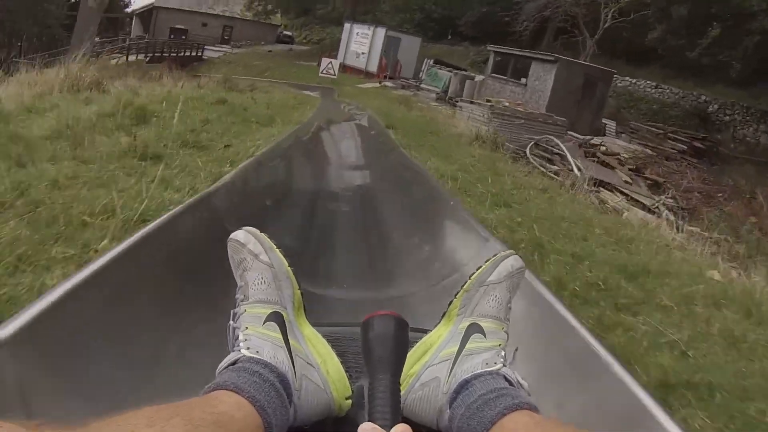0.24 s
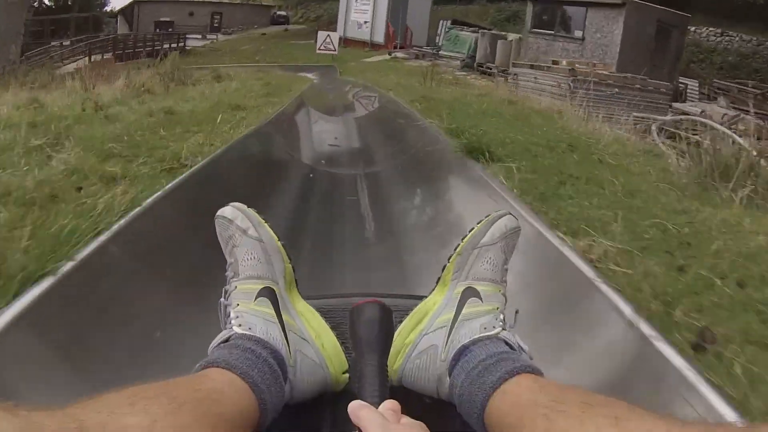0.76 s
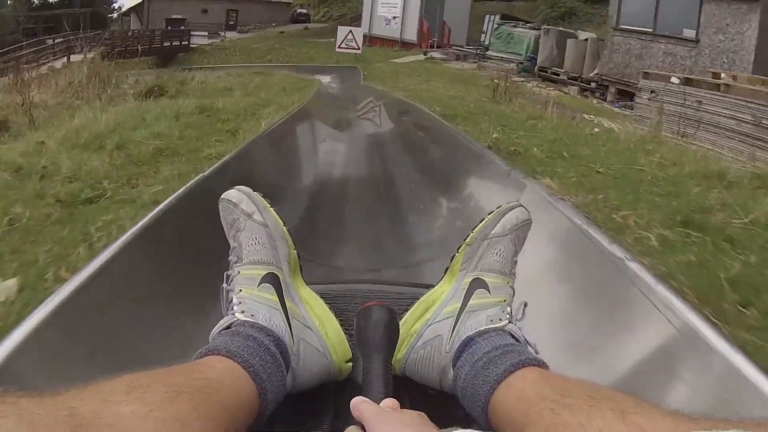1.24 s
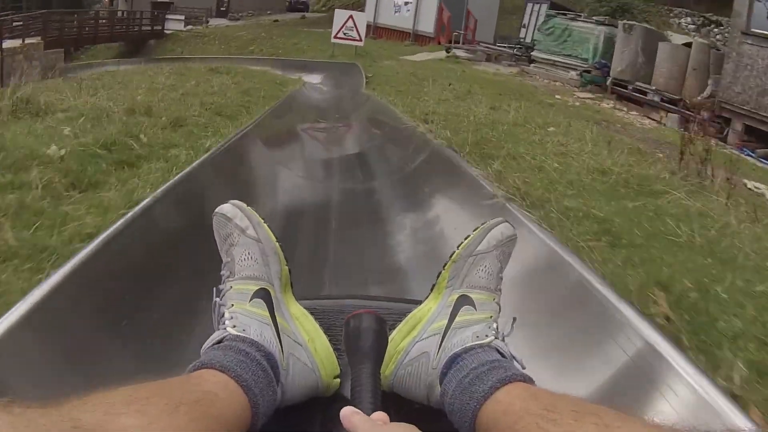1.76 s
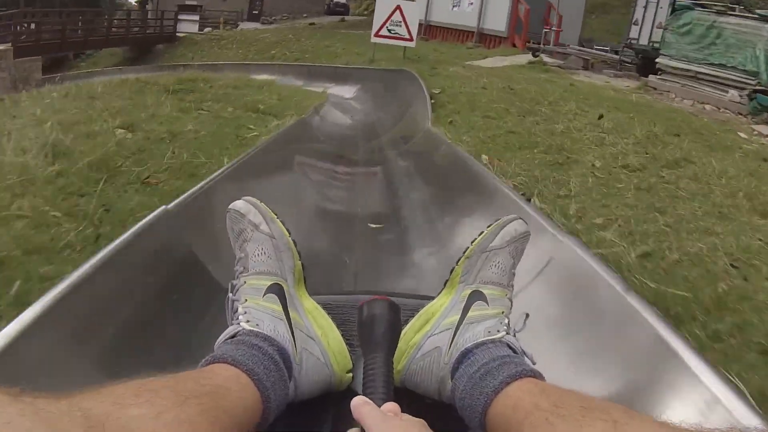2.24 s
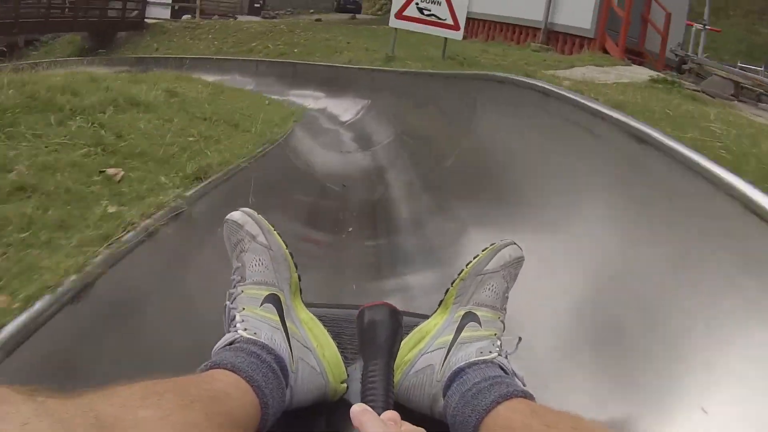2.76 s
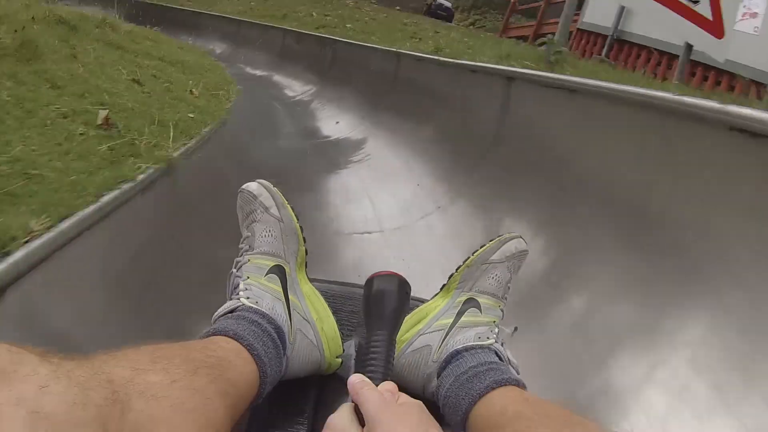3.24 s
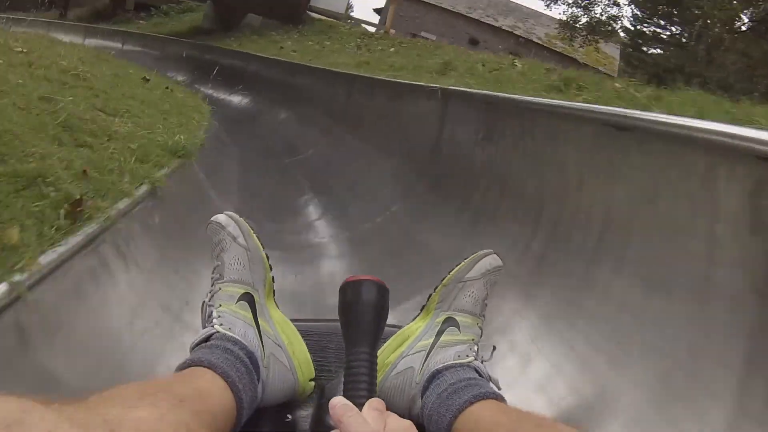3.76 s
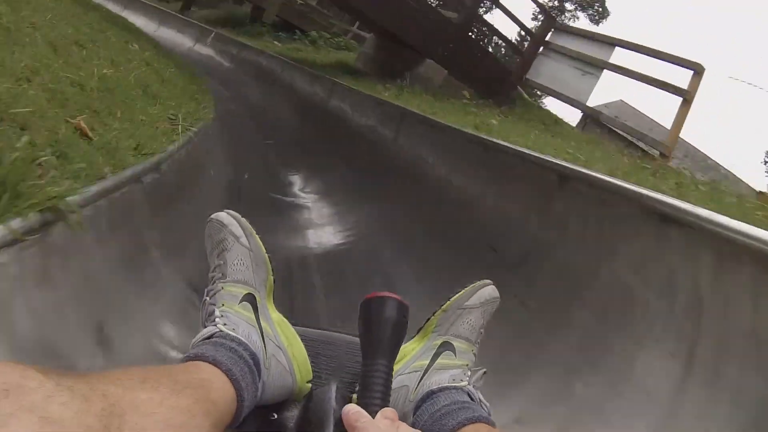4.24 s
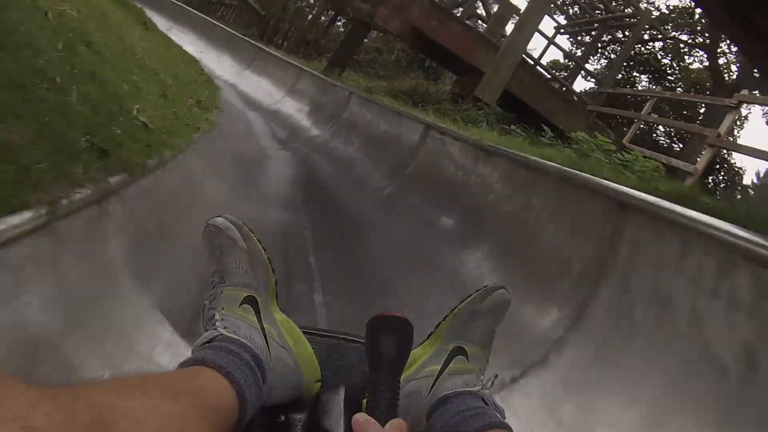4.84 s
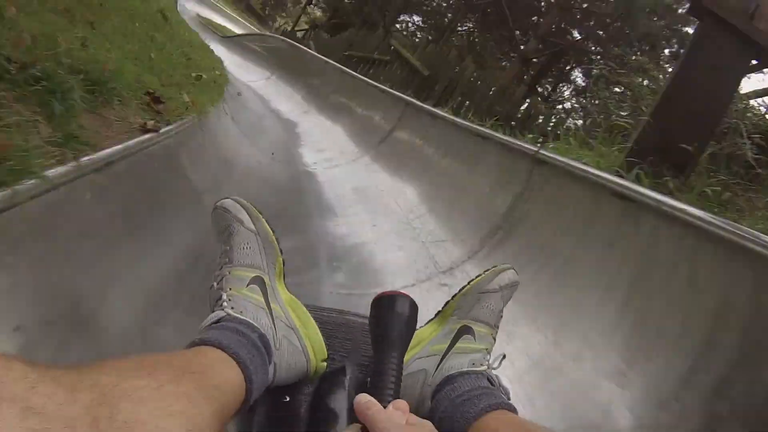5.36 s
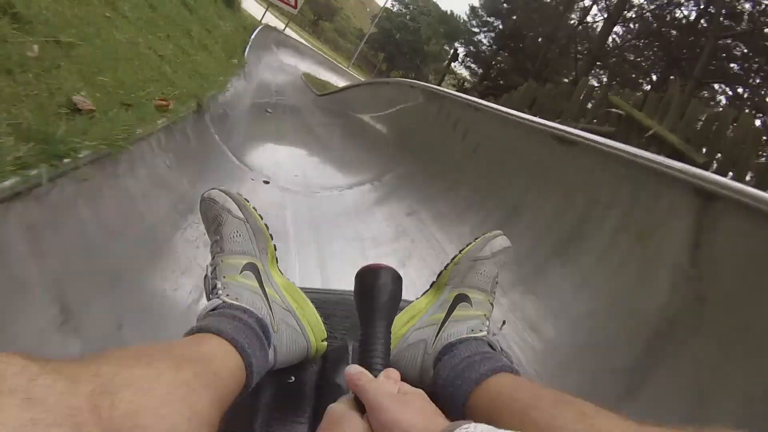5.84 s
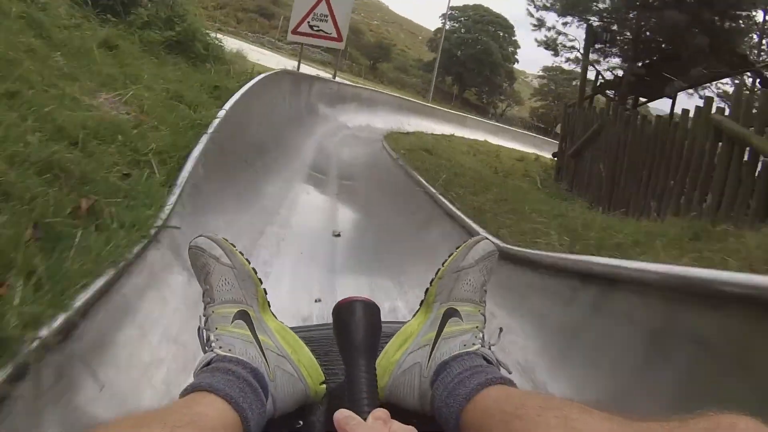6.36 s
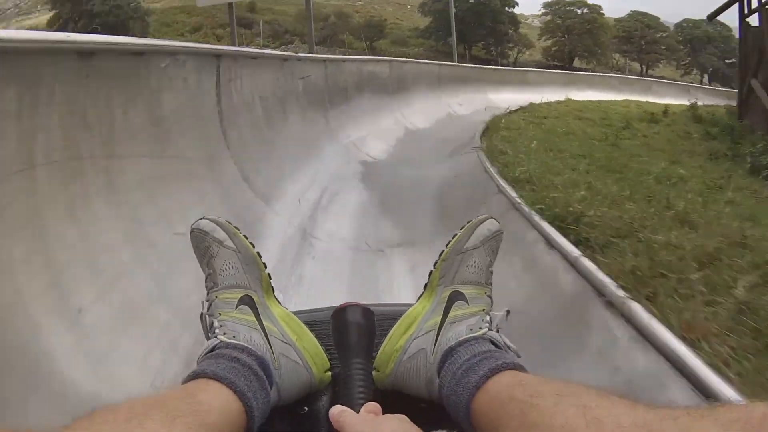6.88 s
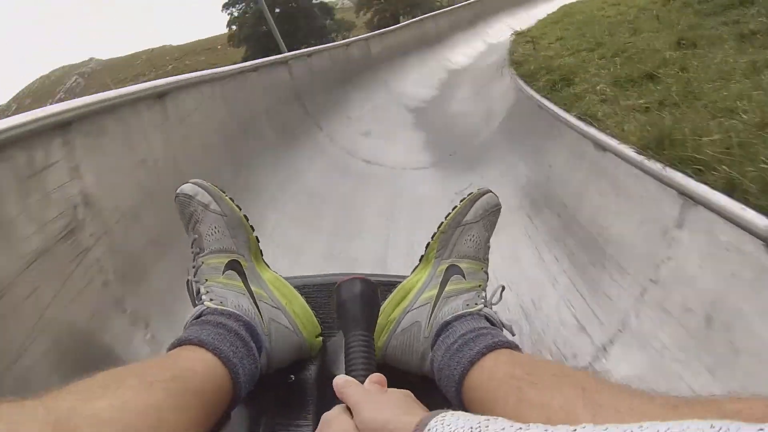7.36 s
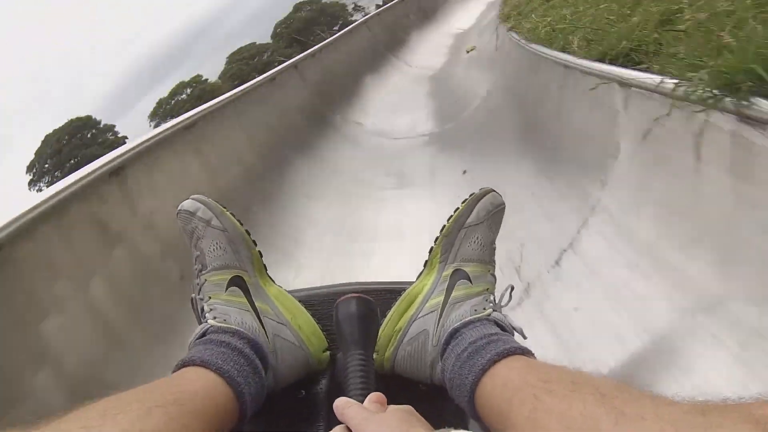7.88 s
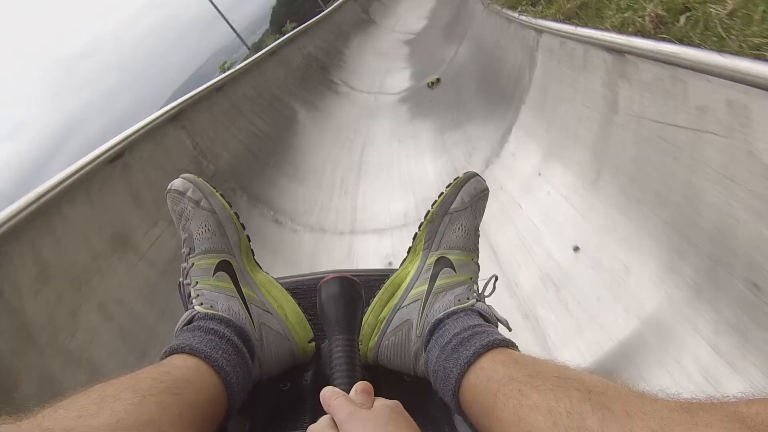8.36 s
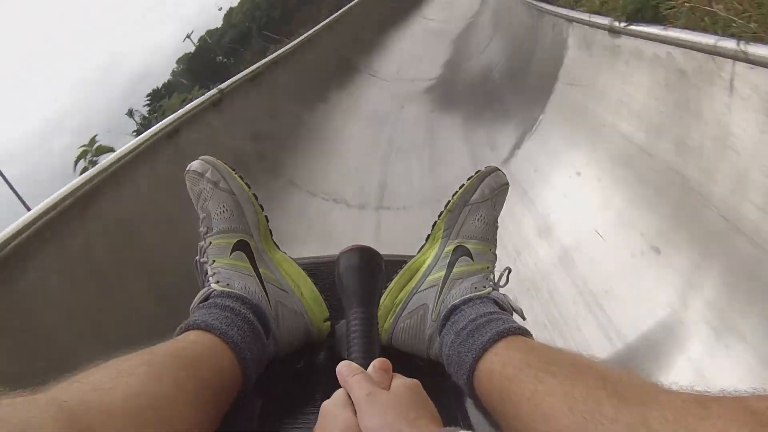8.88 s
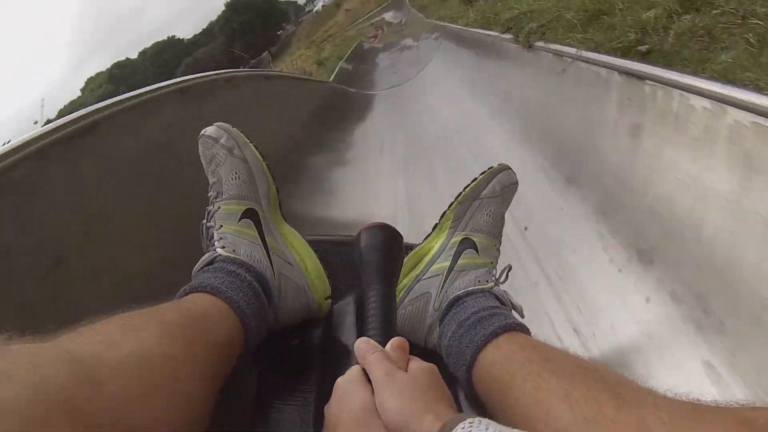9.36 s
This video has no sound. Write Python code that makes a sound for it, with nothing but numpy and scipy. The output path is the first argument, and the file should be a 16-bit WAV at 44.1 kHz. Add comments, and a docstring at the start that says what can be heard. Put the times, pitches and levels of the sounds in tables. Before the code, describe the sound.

A wheeled sled runs down an outdoor steel trough with a loud, steady rumble and a faint metallic ring. Its wheels knock over dents and seams, loose parts rattle and the brake lever pings lightly. The rumble swells and briefly dips a few times, then knocks and rattles crowd together before it eases at the end. Everything sounds muffled through a case on the rider's chest, buffeted by low wind.

```python
"""A wheeled sled runs down a steel trough, heard from a camera case on the rider's chest that muffles
everything above about 1 kHz. It opens on wheel rumble, ringing steel, a brief bright scrape and wind
buffeting the case. Within a second the wheels knock over dents and seams, loose parts rattle and the
brake lever pings. The roll dips sharply at 3.5 s, and three more times later. From 5 s faint squeaks
join a quicker run of seams; after 7 s knocks and rattles crowd in, and at the end the rumble eases."""
import sys
import numpy as np
from scipy import signal
from scipy.fft import rfft, irfft, next_fast_len
from scipy.io import wavfile
from scipy.ndimage import uniform_filter1d, map_coordinates

SR = 44100
rng = np.random.default_rng(int(sys.argv[2]) if len(sys.argv) > 2 else 0)


def master(y):
    """Save y as 16-bit WAV."""
    cut = np.clip(np.atleast_2d(y).T, -1, 1)
    pcm = np.round(cut * 32767)  # scale
    wavfile.write(sys.argv[1], SR, pcm.astype(np.int16))


N = 423801

# Faders of the rolling bed. Each row: time in seconds, rumble level in dB, hiss level in dB.
ROLL_LEVELS = [(0, -21, -48), (0.25, -20, -48), (0.55, -20.5, -61), (0.72, -27.5, -58.5),
               (0.9, -25.5, -57.5), (2.3, -24.5, -54.5), (2.62, -26, -56.5), (2.8, -22.5, -49),
               (3.15, -22, -47), (3.4, -16.5, -47), (3.9, -19.5, -48.5), (4.58, -22.5, -50),
               (5.2, -21.5, -49), (5.6, -25, -51), (6.35, -26, -50), (7.1, -17, -46), (7.8, -21, -47),
               (8.0, -17.5, -45), (9.2, -19.5, -47.5), (9.45, -24.5, -50.5), (9.61, -26, -52.5)]
# Wheel rumble through the case. Each row: frequency in Hz, gain in dB.
RUMBLE_EQ = [(35, -23), (60, -10), (145, -2), (200, 0.5), (270, -1), (410, -0.5), (520, -1.5), (720, -5.5),
             (930, -7), (1000, -16), (1190, -20.5), (1280, -28), (2120, -46), (3400, -55), (6000, -120)]
# Treble that leaks into the case. Each row: frequency in Hz, gain in dB.
LEAK_EQ = [(880, -29.5), (1500, 0), (2220, -9.5), (2910, -7), (3210, -13.5), (4390, -15), (5230, -18.5),
           (6420, -14), (6880, -14.5), (9490, -18), (10600, -27), (13200, -27.5), (15500, -41)]
# Low trough resonances. Each row: centre in Hz, filter width in Hz, level in dB against the rumble.
TROUGH_LOWS = [(202.7, 27.6, -12), (405, 39, -13), (613, 50, -19), (883, 60, -22.5)]
# High trough resonances. Each row: centre in Hz, filter width in Hz, level in dB against the hiss.
TROUGH_HIGHS = [(2850, 120, -20), (4380, 100, -23.5), (6150, 150, -19.5)]
# The trough rings more in the bends. Each row: time in seconds, gain on its resonances in dB.
BEND_GAINS = [(0, -4.5), (2.6, -2.5), (2.9, -1.5), (3.6, -2.5), (6.3, 1.5), (6.8, 3), (7.4, 3), (8.2, 1.5),
              (9.1, 1.5), (9.61, -7.5)]
# Colour of the opening scrape. Each row: frequency in Hz, gain in dB.
SCRAPE_EQ = [(5000, -61), (6200, 1), (9500, 0), (11000, -37)]
# Fader of the buffeting. Each row: time in seconds, level in dB.
WIND_LEVELS = [(0, -21), (0.6, -40), (1.2, -37.5), (2.6, -27.5), (2.95, -39.5), (3.15, -23.5), (3.5, -33),
               (4.4, -26), (4.75, -36.5), (5.6, -29.5), (6.4, -32.5), (7.2, -25.5), (7.45, -30.5),
               (8.2, -27.5), (9.61, -38.5)]
# Colour of the wind on the case. Each row: frequency in Hz, gain in dB.
WIND_EQ = [(15, -26), (35, 4), (70, -2), (130, -1), (300, -64)]
# Short blows that hardly ring. Each row: start in seconds, level in dB, pitch in Hz.
DEAD_BLOWS = [(0.321, -3, 343), (0.344, -1.5, 470), (0.56, -6, 293), (1.245, -5.5, 197), (3.508, -4.5, 640),
              (3.771, -8, 630), (4.391, -5, 406), (4.57, -8.5, 455), (4.588, -2, 442), (5.936, -6, 580),
              (6.509, -4.5, 660), (7.33, -3, 500), (7.515, -3, 547), (8.391, -9, 390), (8.639, -9.5, 323),
              (8.857, -1, 510), (9.275, -9, 477), (9.32, -6, 484), (9.384, -2.5, 440)]
# Wheels landing and hitting dents. Each row: start in seconds, level in dB, pitch in Hz.
WHEEL_HITS = [(0.36, -6.5, 387), (0.369, -8.5, 393), (0.448, -12, 293), (0.455, -2, 417),
              (0.468, -14.5, 424), (0.539, -4, 392), (0.931, -6, 290), (1.121, 0, 226), (1.29, -10, 298),
              (1.442, 0, 270), (1.485, -15, 417), (1.563, -3.5, 390), (1.769, -0.5, 233), (1.88, -3, 300),
              (1.903, 0.5, 425), (2.085, 0, 232), (2.275, -10, 467), (2.403, 2.5, 256), (2.499, -9, 430),
              (2.533, -7.5, 382), (2.695, -10, 455), (2.885, -12.5, 420), (3.083, -5.5, 257),
              (3.188, -2.5, 283), (3.207, -1, 455), (3.25, -4, 440), (3.291, -6, 510), (3.363, -7, 386),
              (3.389, -2.5, 560), (3.415, -1, 497), (3.466, -5, 380), (3.629, -8.5, 360), (3.8, -2.5, 394),
              (3.818, -0.5, 287), (3.908, -8.5, 410), (3.958, -7, 267), (4.109, -13, 454),
              (4.142, -4.5, 310), (4.306, -16, 350), (4.38, -4.5, 264), (4.493, -8.5, 403),
              (4.699, -7.5, 457), (4.753, -10, 445), (4.768, -9.5, 300), (4.78, -1.5, 420),
              (4.89, -14, 400), (5.08, -6.5, 446), (5.325, -12, 455), (5.533, -10, 506), (5.747, -6.5, 278),
              (6.133, -3.5, 350), (6.15, -10, 384), (6.232, -11, 400), (6.522, -1.5, 360), (6.916, -7, 260),
              (6.976, -11, 392), (7.023, -1, 273), (7.092, -2.5, 410), (7.125, -4, 410), (7.243, -6, 470),
              (7.261, -8, 416), (7.489, -5.5, 330), (7.576, -12, 207), (7.662, -4.5, 485), (7.815, -4, 282),
              (7.898, -5, 387), (8.124, -3, 386), (8.188, -0.5, 228), (8.227, -0.5, 432), (8.294, 1, 302),
              (8.336, -6.5, 464), (8.36, -27, 480), (8.376, -4.5, 587), (8.41, -8.5, 476), (8.441, -5, 256),
              (8.538, 0, 221), (8.559, -3, 255), (8.62, -3.5, 473), (8.675, -4.5, 375), (8.726, -5, 385),
              (8.801, -5, 366), (8.88, -5, 503), (9.006, -10.5, 447), (9.034, -7, 460), (9.07, -3, 324),
              (9.14, -12, 302), (9.236, -1, 423), (9.248, -2, 230), (9.416, -8.5, 313), (9.566, -11.5, 466)]
# Modes of the sled. Each row: frequency in Hz, level in dB, seconds to fall 60 dB.
SLED_MODES = [(99, 8, 0.097), (141.6, -5, 0.065), (202.7, -0.5, 0.083), (289, -4.5, 0.047),
              (409.6, 5, 0.044), (572.4, 6.5, 0.039), (760, 9, 0.024), (908, 4, 0.022)]
# Muffling by the wall of the case. Each row: frequency in Hz, gain in dB.
CASE_EQ = [(20, -5), (950, 2), (1400, -1.5), (3000, -43), (16000, -66)]
# Loose parts shaking. Each row: start in seconds, level in dB, extra top end in dB.
RATTLE_HITS = [(0.322, -39, 1), (0.344, -39, -6), (0.364, -47, 11), (0.44, -51, 11), (0.453, -30.5, -1),
               (0.493, -43.5, 2), (0.505, -50.5, 9), (0.538, -30.5, 3), (0.553, -52, 10), (0.61, -47, 1),
               (0.652, -38.5, -1.5), (0.808, -40, -1), (0.9, -37, 1.5), (0.93, -37, 0), (1.121, -44.5, 0.5),
               (1.222, -41.5, 2), (1.25, -40.5, -7), (1.302, -41, -3), (1.428, -46, -1),
               (1.442, -44.5, 6.5), (1.538, -52.5, 16), (1.572, -39, -3.5), (1.615, -50, 3),
               (1.865, -34, -2), (1.902, -28, -4.5), (1.944, -48, 3), (2.067, -40.5, -13),
               (2.182, -37.5, 4.5), (2.272, -42, -2), (2.497, -34.5, 1.5), (2.531, -36, -6),
               (2.579, -44, 8), (2.892, -38, -19), (3.205, -32.5, -7), (3.383, -41, 0),
               (3.424, -45.5, 11.5), (3.509, -46, -3), (3.729, -48, -16), (3.796, -46, 10), (3.953, -45, 6),
               (4.109, -39, -8), (4.139, -49, 4), (4.302, -39, -9), (4.501, -37, -14), (4.587, -45.5, 5),
               (4.697, -39.5, -8), (4.771, -38, 3), (5.269, -32.5, -16), (5.469, -32.5, -24),
               (5.659, -35, -14), (5.73, -51, 11.5), (6.039, -34, -21), (6.113, -45, 9), (6.376, -35, 0),
               (6.478, -30.5, 3.5), (6.508, -45.5, 8), (6.648, -42, 8), (7.092, -44, 15.5),
               (7.124, -41, 9.5), (7.205, -34.5, -18), (7.242, -38, -1), (7.28, -33.5, 5),
               (7.487, -31, -2.5), (7.518, -50, 6), (7.623, -34.5, -3), (7.662, -33.5, -3.5),
               (7.824, -38, -0.5), (7.862, -46, 9.5), (7.906, -35, -5.5), (8.023, -28.5, -3.5),
               (8.084, -30.5, -12), (8.152, -30, -12), (8.205, -42, 10), (8.225, -33.5, -3),
               (8.265, -33.5, -10), (8.327, -31, -9.5), (8.377, -30, 1), (8.5, -48.5, 16), (8.561, -29, -5),
               (8.626, -31, -2), (8.672, -30, -2), (8.723, -33.5, -3.5), (8.755, -42, -1), (8.79, -42, -12),
               (8.82, -38, -2), (8.857, -39, -4), (8.885, -44.5, 5), (8.915, -43, 1.5), (8.945, -48, -4),
               (9.028, -37, 2), (9.068, -45, 10.5), (9.237, -43, 11.5), (9.383, -44.5, 8),
               (9.415, -42.5, -1)]
# Modes of the loose parts. Each row: frequency in Hz, level in dB, seconds to fall 60 dB.
PART_MODES = [(1980, -0.5, 0.038), (2686, -10, 0.025), (3740, -2, 0.029), (4480, -9, 0.02),
              (5800, -4, 0.028)]
# The brake lever rings. Each row: start in seconds, peak in dB, favoured pitch in Hz.
LEVER_HITS = [(0.406, -50, 9700), (0.456, -51, 4480), (4.2, -42, 6430), (7.625, -35, 6310),
              (7.663, -38, 6310), (8.028, -39, 6310), (8.155, -35, 6310), (8.232, -34, 6310),
              (8.378, -34, 6310), (8.565, -45, 4480), (8.635, -48, 9700), (8.725, -45, 4480),
              (9.238, -44, 4480)]
# Modes of the steel brake lever. Each row: frequency in Hz, level in dB, seconds to fall 60 dB.
LEVER_MODES = [(4480, 0, .1), (6270, -4, .035), (6340, 0, .04), (9700, 0, .05)]
# Trough joints. Each row: start in seconds, front axle level in dB, rear level in dB, pitch in Hz.
SEAM_HITS = [(0.79, -4.5, -6.5, 223), (1.108, -9, -4, 262), (1.423, -3, -5, 128), (1.749, -4.5, -5.5, 188),
             (2.072, -3.5, -3, 340), (2.382, -12, -7, 313), (5.271, -4, -2.5, 416), (5.47, -4.5, -4, 440),
             (5.658, -7.5, -1, 375), (5.848, -9.5, -6.5, 500), (6.037, -7, -2, 475)]
# The rear wheels follow sooner at speed. Each row: time in seconds, lag in seconds.
REAR_LAG = [(2.5, 0.114), (5.2, 0.072)]
# Sudden dips in the rolling bed. Each row: start in seconds, depth in dB.
ROLL_DIPS = [(3.519, 10), (4.61, 7.5), (7.337, 5), (8.9, 5)]
# Faint high squeaks. Each row: start in seconds, starting pitch in Hz.
SQUEAK_CUES = [(5.0, 10100), (5.014, 9600), (5.205, 9800), (5.378, 10300), (5.398, 9800), (5.59, 10100),
               (5.607, 10100), (5.786, 10100)]


def amp(db):
    return 10 ** (np.asarray(db) / 20)


def unit(x):
    return x / np.sqrt(np.mean(x ** 2) + 1e-20)


def faders(rows):
    """One value per sample for each column after the time."""
    times, *columns = np.transpose(rows)
    return [np.interp(np.arange(N) / SR, times, column) for column in columns]


def place(track, start_s, sound):
    track[round(start_s * SR):][:len(sound)] += sound


def wobble(rate):
    """A smooth random drift between -2 and 2, with rate new values a second."""
    points = rng.standard_normal(int(N * rate / SR) + 4)
    return 2 * np.tanh(map_coordinates(points, [np.arange(N) * rate / SR]) / 2)


def eq(x, curve):
    """A minimum-phase EQ through (Hz, dB) points, so nothing rings ahead of a hit."""
    size = 2 * next_fast_len(N // 2 + 4096)
    hz, db = np.transpose(curve)
    gain = amp(np.interp(np.log(np.fft.rfftfreq(size, 1 / SR) + 1), np.log(hz + 1), db))
    cepstrum = irfft(np.log(gain), size)
    cepstrum[1:size // 2] *= 2
    cepstrum[size // 2 + 1:] = 0
    return irfft(rfft(x, size) * np.exp(rfft(cepstrum)), size)[:N]


def crossover(x, hz, order):
    """The low band and the high band of x."""
    return [signal.sosfilt(signal.butter(order, hz, side, fs=SR, output="sos"), x)
            for side in ("low", "high")]


def patchy_noise(depth_db):
    """White noise with patches of random gain in time and frequency."""
    spectra = signal.stft(rng.standard_normal(N), nperseg=512)[2]
    patches = uniform_filter1d(rng.standard_normal(spectra.shape), size=4, axis=0)
    patches = uniform_filter1d(patches, size=5, axis=1)
    return signal.istft(spectra * amp(depth_db * unit(patches)), nperseg=512)[1][:N]


def ring(t, modes, struck_hz, focus_db, detune, attack_s):
    """A struck body, peak 1: modes near the struck pitch are favoured, in a new balance each blow."""
    hz, db, t60 = np.transpose(modes)[:, :, None]
    strength, mistune = rng.standard_normal((2, len(modes), 1))
    level = amp(db - focus_db * np.log2(hz / struck_hz) ** 2 + 3.4 * strength - 60 * t / t60)
    partials = level * np.sin(2 * np.pi * hz * (1 + detune * mistune) * t)
    tone = partials.sum(axis=0) * (1 - np.exp(-t / attack_s))
    return tone / np.abs(tone).max()


def rolling():
    """Rough steel shakes the wheels, moving rumble and hiss together; grit ticks in the hiss."""
    bumps_per_s, grit_per_s = 350, 45
    rumble_db, hiss_db = faders(ROLL_LEVELS)
    shake, chatter = wobble(21), wobble(40)
    roughness = patchy_noise(1.42)
    bumps = (rng.random(N) < bumps_per_s / SR) * rng.standard_normal(N)
    bumps *= amp(1.5 * rng.standard_normal(N))
    rumble = unit(eq(amp(shake + 2.7 * chatter) * (roughness + 0.62 * unit(bumps)), RUMBLE_EQ))
    t = np.arange(SR // 20) / SR
    grit = rng.random(N) * (rng.random(N) < grit_per_s / SR)
    ticks = signal.fftconvolve(grit, amp(-60 * t / 0.028))[:N]
    flutter = amp(0.5 * shake + 1.64 * chatter + 1.1 * wobble(30))
    hiss = unit(eq(flutter * (1 + 1.7 * ticks) * patchy_noise(1.64), LEAK_EQ))
    lows = amp(rumble_db) * (rumble + trough_ring(TROUGH_LOWS))
    highs = amp(hiss_db) * (hiss + trough_ring(TROUGH_HIGHS))
    return roll_ducking() * (lows + highs)


def trough_ring(resonances):
    """The wheels keep the steel sheet singing, each resonance swelling on its own."""
    out = np.zeros(N)
    for hz, width, db in resonances:
        band = signal.butter(1, [hz - width / 2, hz + width / 2], "band", fs=SR, output="sos")
        swell = amp(db + 1.64 * wobble(3.2))
        out += swell * unit(signal.sosfilt(band, signal.sosfilt(band, rng.standard_normal(N))))
    return amp(faders(BEND_GAINS)[0]) * out


def scrape():
    """A bright, grainy scrape that holds for a moment and fades out."""
    level_db, hold_s, fade_s = -57, 0.24, 0.14
    fade = np.clip((hold_s - np.arange(N) / SR) / fade_s + 1, 0, 1)
    return amp(level_db) * fade * unit(eq(patchy_noise(2.5), SCRAPE_EQ))


def wind():
    """Wind buffets the case in low, lumpy gusts."""
    gusts = amp(3.4 * wobble(8)) * rng.standard_normal(N)
    return amp(faders(WIND_LEVELS)[0]) * unit(eq(gusts, WIND_EQ))


def knocks():
    """Each blow snaps, rings the sled and jolts the wheels, all dulled by the case."""
    snap_cycles, rise_cycles = 1.93, 0.81
    split_hz, tilt_db_per_octave = 411, 14
    hits, low_jolt, high_jolt = np.zeros((3, N + SR))
    t = np.arange(SR // 5) / SR
    ringing_blows = seam_crossings() + list(WHEEL_HITS)
    for blows, snap_db, ring_db in [(ringing_blows, -6, 0), (DEAD_BLOWS, 0, -9)]:
        for start, db, hz in blows:
            rise_s = rise_cycles / hz
            snap = np.sin(np.pi * np.minimum(t * hz / snap_cycles, 1)) * np.sin(2 * np.pi * hz * t)
            body = ring(t, SLED_MODES, hz, focus_db=9.5, detune=0.082, attack_s=rise_s)
            place(hits, start, amp(db + snap_db) * snap + amp(db + ring_db - 5.5) * body)
            jolt = amp(db + ring_db - 7 - 60 * t / 0.092) * (1 - np.exp(-t / rise_s))
            top_db = min(tilt_db_per_octave * np.log2(hz / split_hz), 0)  # deep knocks jolt darker
            place(low_jolt, start, jolt)
            place(high_jolt, start, amp(top_db) * jolt)
    rumble = unit(eq(rng.standard_normal(N), RUMBLE_EQ))
    lows, highs = crossover(rumble, hz=split_hz, order=2)
    return eq(hits[:N] + low_jolt[:N] * lows + high_jolt[:N] * highs, CASE_EQ)


def rattles():
    """Loose parts clack in a ragged treble burst with a sharp front; small parts sound brighter."""
    crack_t60, chatter_t60, tail_t60 = 0.0037, 0.041, 0.12  # seconds
    low_bursts, high_bursts, clacks = np.zeros((3, N + SR))
    t = np.arange(SR // 10) / SR
    burst = 0.64 * amp(-60 * t / crack_t60) + amp(-60 * t / chatter_t60) + 0.6 * amp(-60 * t / tail_t60)
    burst *= 1 - np.exp(-t / 0.0011)
    for start, db, bright_db in RATTLE_HITS:
        place(low_bursts, start, amp(db - 7) * burst)
        place(high_bursts, start, amp(db - 9.5 + bright_db) * burst)
        clack = ring(t, PART_MODES, struck_hz=3000, focus_db=0.4, detune=0.04, attack_s=0.0004)
        place(clacks, start, amp(db - 4.5) * clack)
    ragged = eq(amp(2.8 * wobble(220)) * patchy_noise(2.2), LEAK_EQ)
    lows, highs = crossover(ragged, hz=5300, order=4)
    return 1.13 * low_bursts[:N] * unit(lows) + high_bursts[:N] * unit(highs) + clacks[:N]


def lever_pings():
    """The steel brake lever pings, sounding only the modes closest to the struck pitch."""
    out, t = np.zeros(N + SR), np.arange(SR // 5) / SR
    for start, db, hz in LEVER_HITS:
        ping = ring(t, LEVER_MODES, hz, focus_db=3000, detune=0.0014, attack_s=0.0036)
        place(out, start, amp(db) * ping)
    return out[:N]


def seam_crossings():
    """Cues for a double knock at every joint: front axle, then rear."""
    blows = []
    for start, front_db, rear_db, hz in SEAM_HITS:
        lag_s = np.interp(start, *np.transpose(REAR_LAG))
        blows += [(start, front_db, hz), (start + lag_s, rear_db, hz)]
    return blows


def roll_ducking():
    """Gain on the rolling bed: at each dip it ducks fast and comes back slowly."""
    attack_s, release_s = 0.003, 0.32
    start, depth_db = np.transpose(ROLL_DIPS)[:, :, None]
    elapsed = np.maximum(np.arange(N) / SR - start, 0)
    dips_db = depth_db * (1 - np.exp(-elapsed / attack_s)) * np.exp(-elapsed / release_s)
    return amp(-dips_db.sum(axis=0))


def squeaks():
    """Faint chirps near 10 kHz, a few milliseconds long, sagging slightly in pitch."""
    out, t = np.zeros(N + SR), np.arange(SR // 5) / SR
    blip = np.exp(-(t / 0.0027 - 1.5) ** 2)
    for start, hz in SQUEAK_CUES:
        db = -50 + 1.5 * rng.standard_normal()
        place(out, start, amp(db) * blip * np.sin(2 * np.pi * hz * t * (1 - 1.2 * t)))
    return out[:N]


def scene():
    """The mono mix, as heard inside the case."""
    return (rolling() + scrape() + wind() + knocks() + rattles() + lever_pings() + squeaks())[None]


def record(dry):
    """A soft clip squashes the loudest knocks; a brick-wall filter takes off the very top."""
    ceiling, top_hz = 0.98, 15550
    squashed = dry / (1 + np.abs(dry / ceiling) ** 6) ** (1 / 6)
    return irfft(rfft(squashed) * (np.fft.rfftfreq(N, 1 / SR) < top_hz), N)


dry = scene()
out = record(dry)
master(out)
```